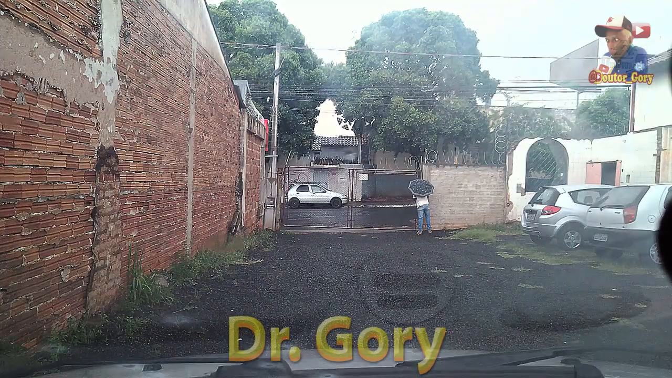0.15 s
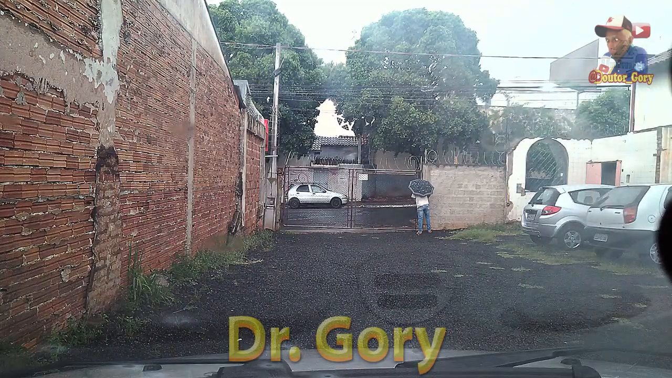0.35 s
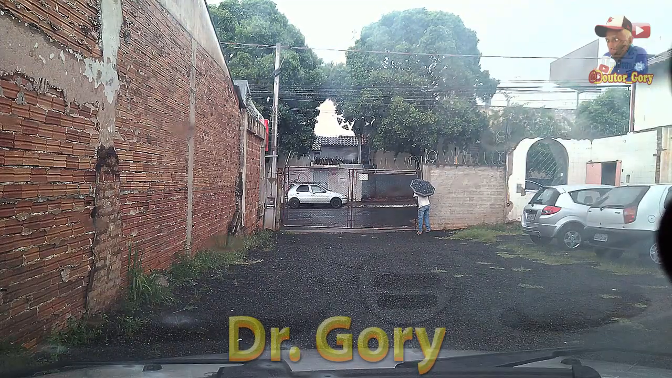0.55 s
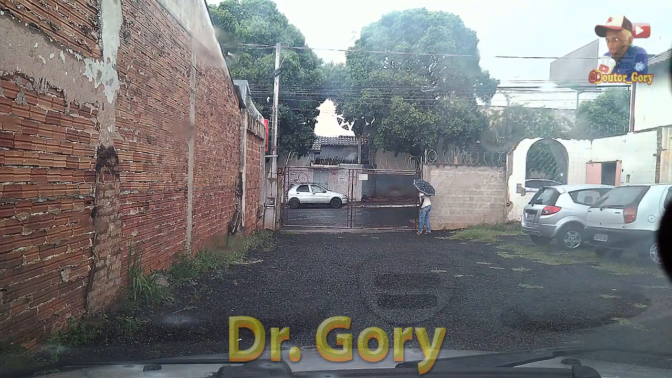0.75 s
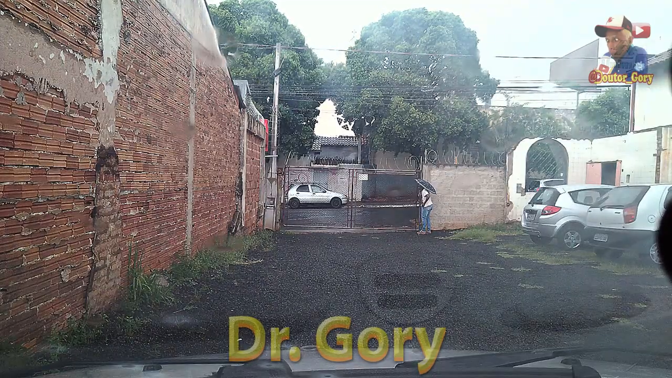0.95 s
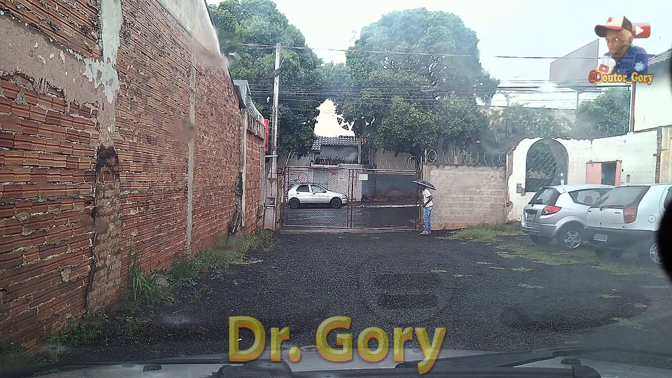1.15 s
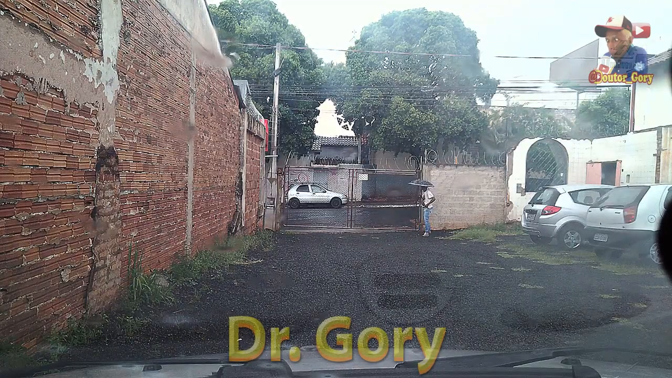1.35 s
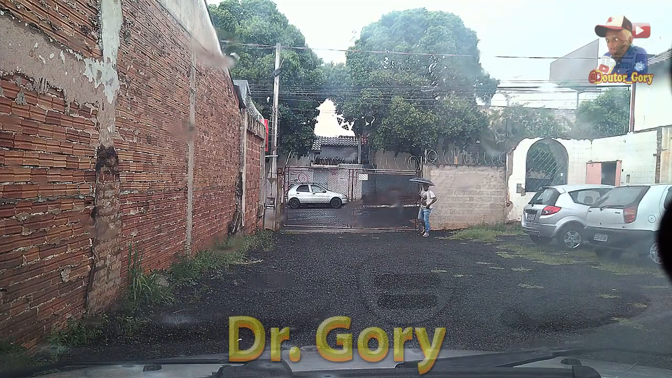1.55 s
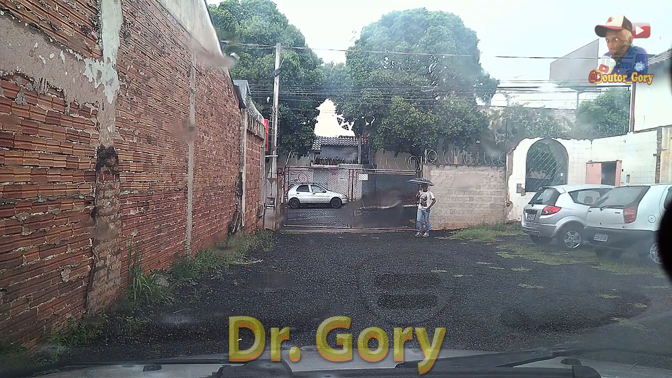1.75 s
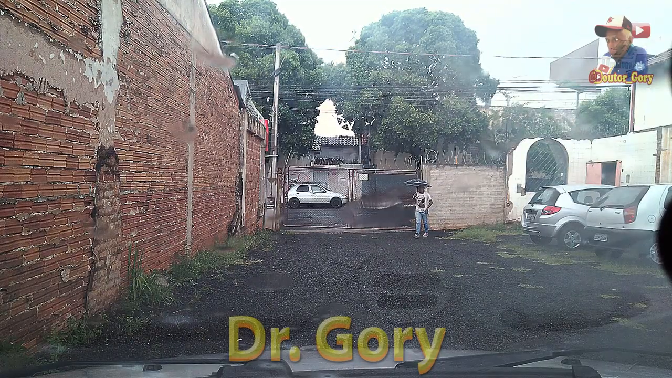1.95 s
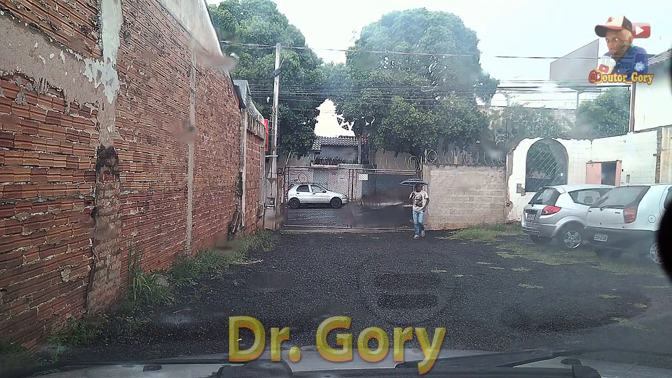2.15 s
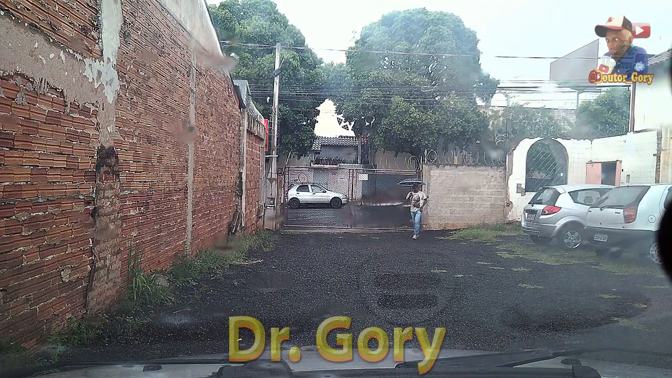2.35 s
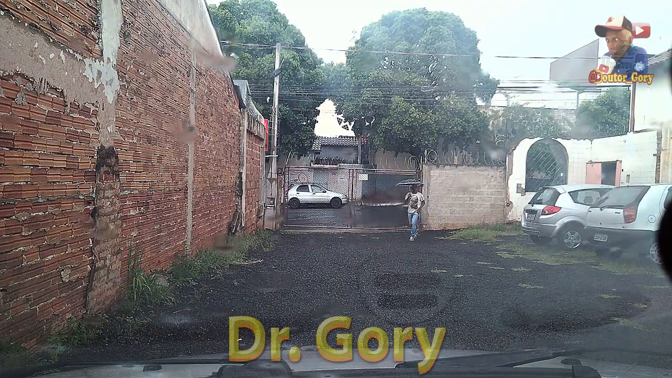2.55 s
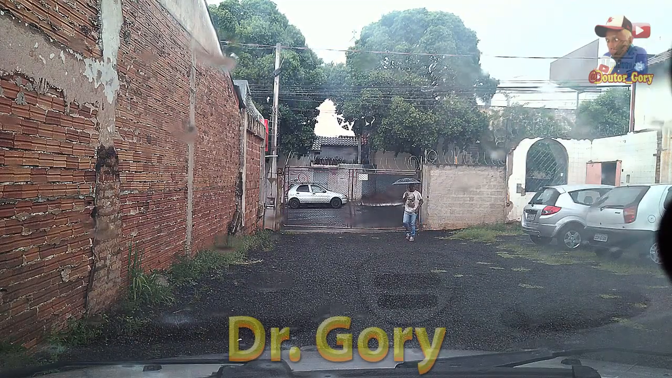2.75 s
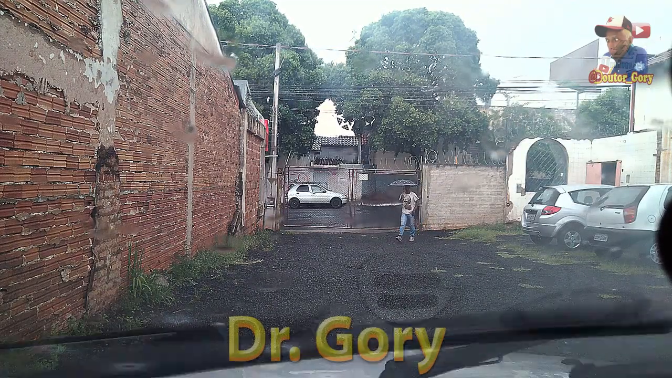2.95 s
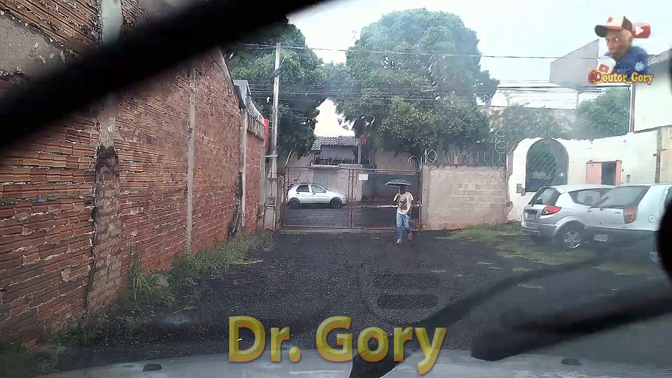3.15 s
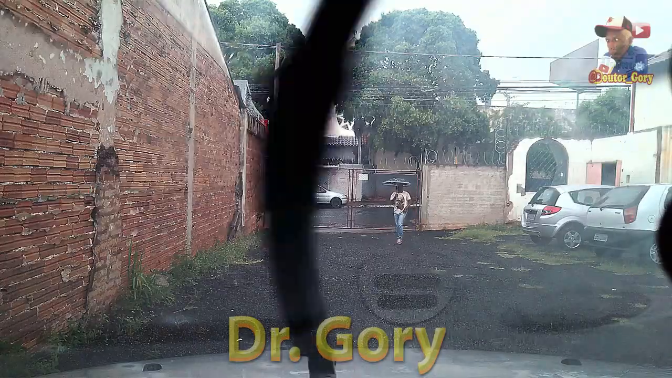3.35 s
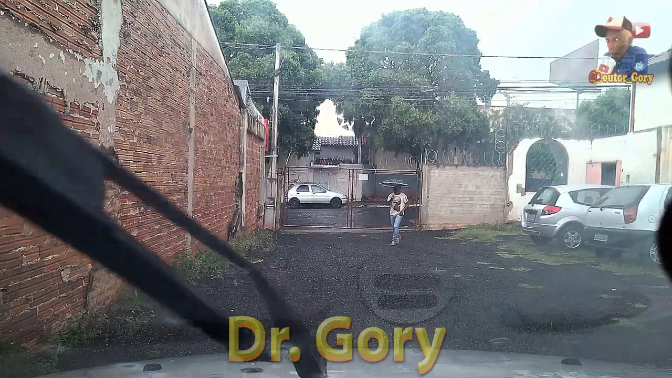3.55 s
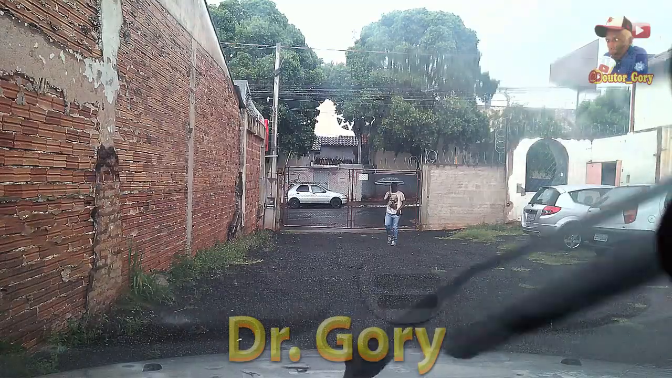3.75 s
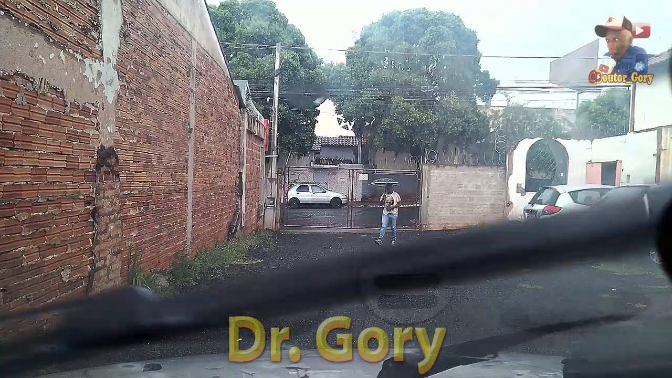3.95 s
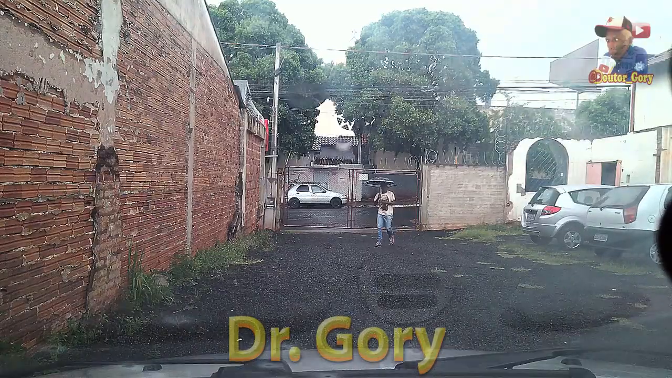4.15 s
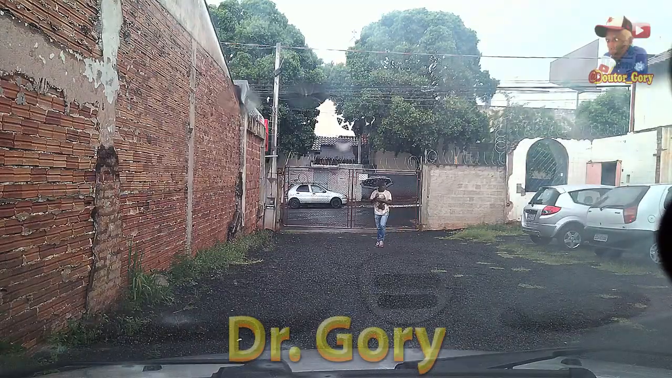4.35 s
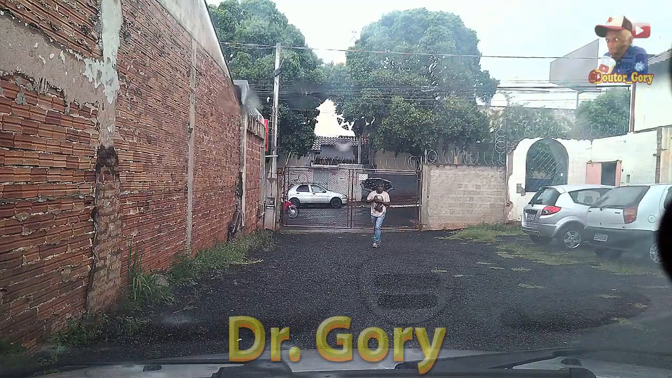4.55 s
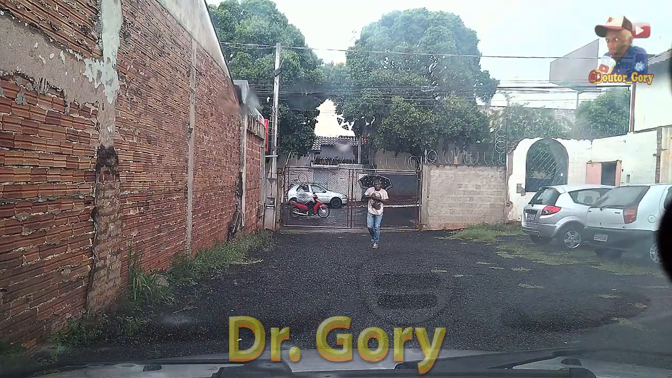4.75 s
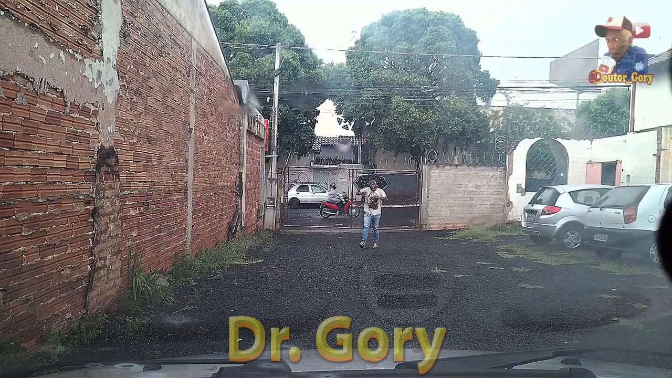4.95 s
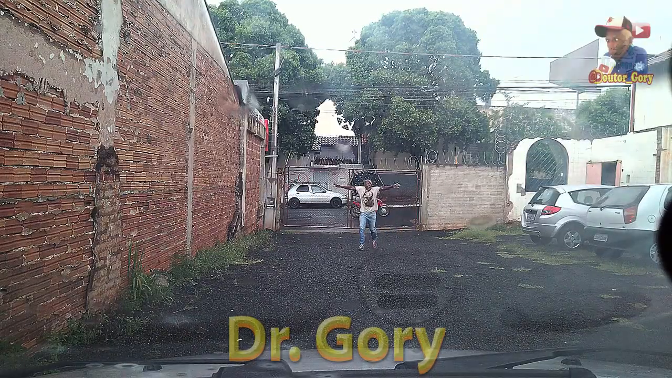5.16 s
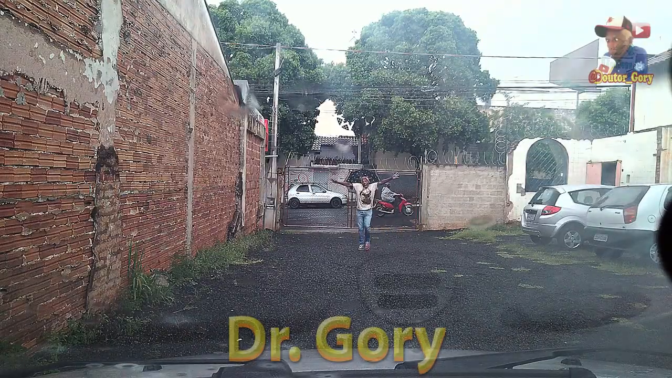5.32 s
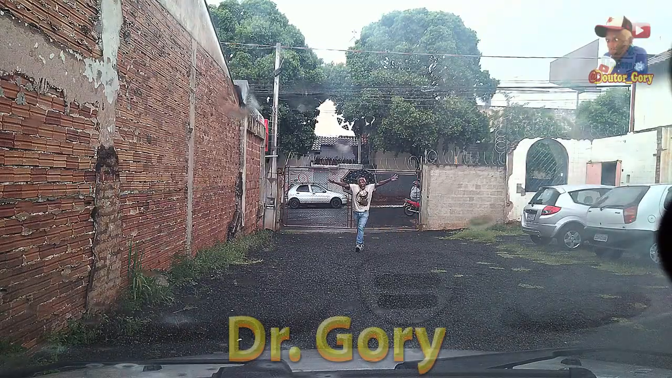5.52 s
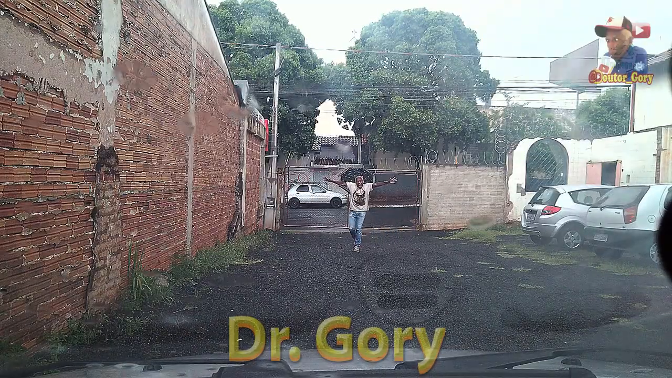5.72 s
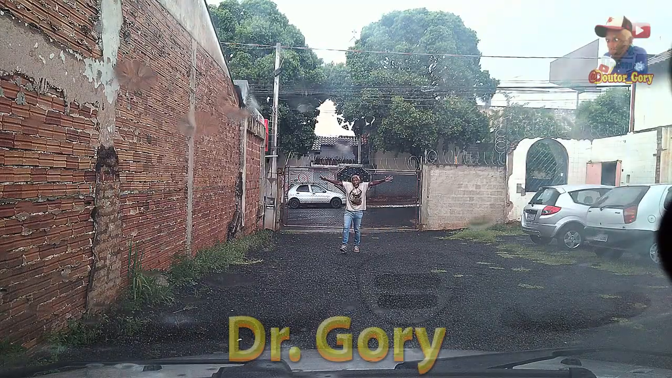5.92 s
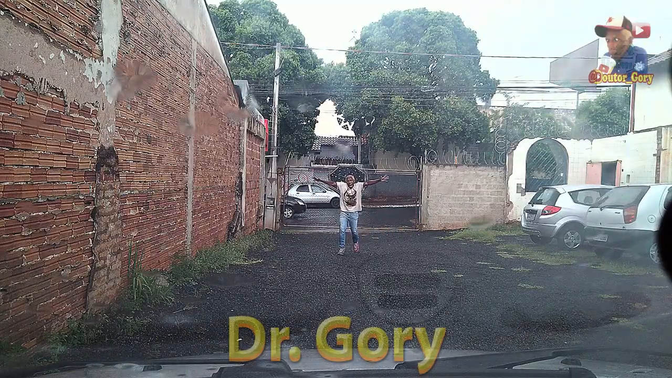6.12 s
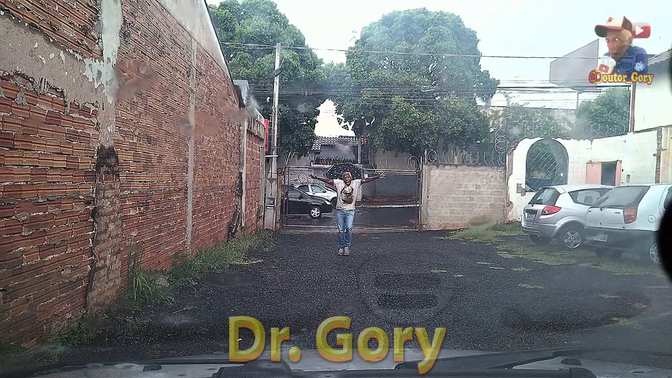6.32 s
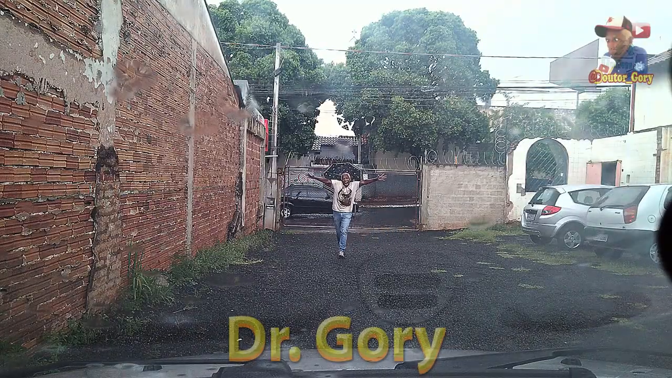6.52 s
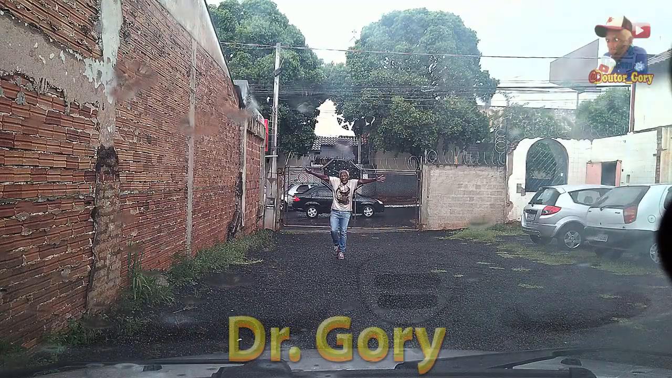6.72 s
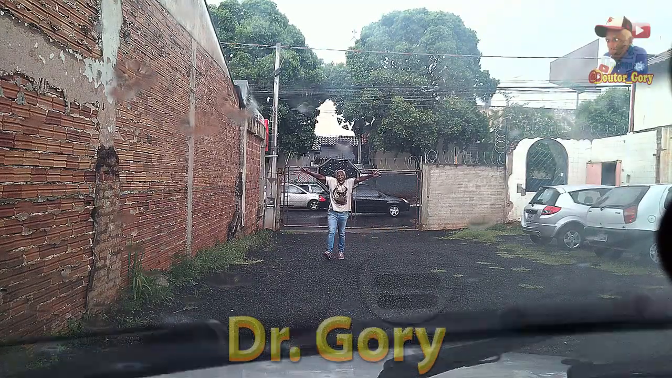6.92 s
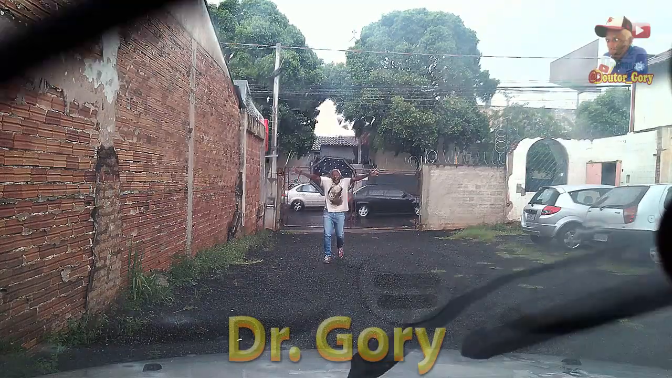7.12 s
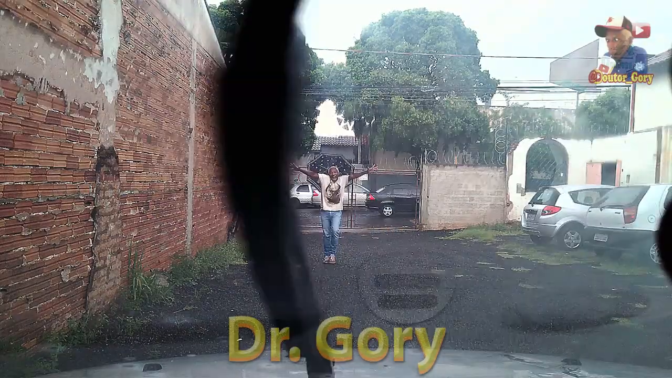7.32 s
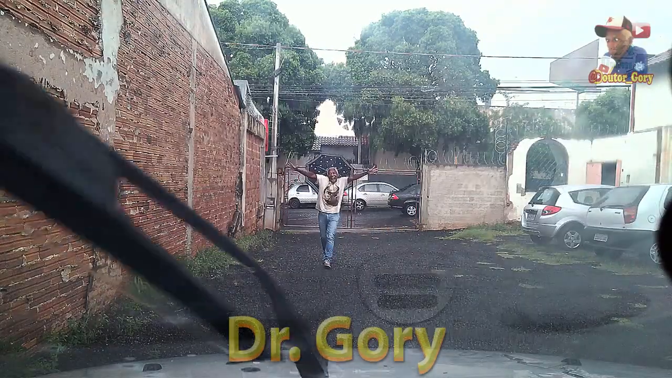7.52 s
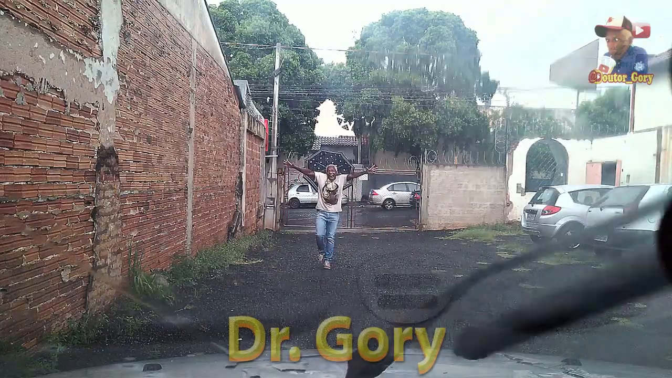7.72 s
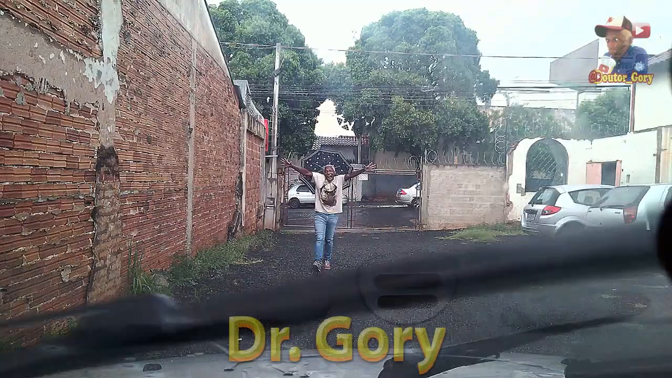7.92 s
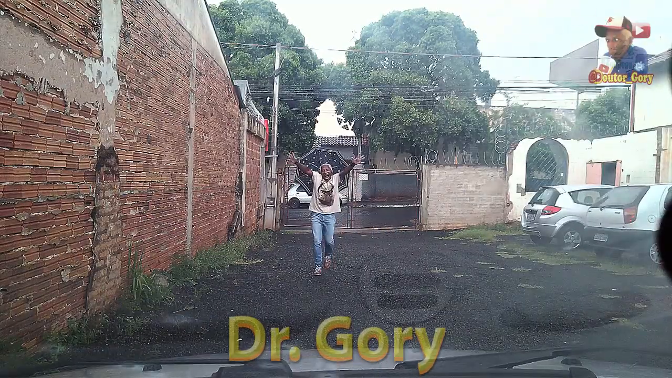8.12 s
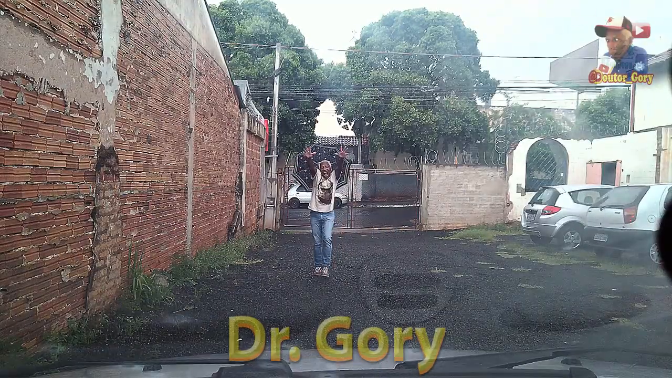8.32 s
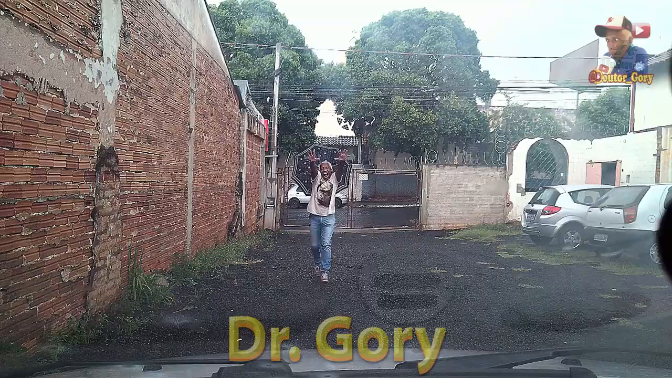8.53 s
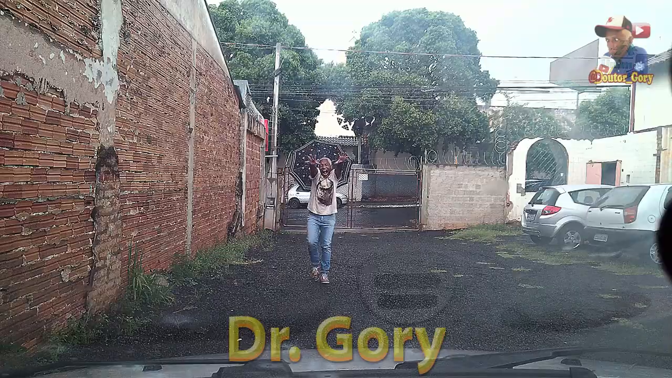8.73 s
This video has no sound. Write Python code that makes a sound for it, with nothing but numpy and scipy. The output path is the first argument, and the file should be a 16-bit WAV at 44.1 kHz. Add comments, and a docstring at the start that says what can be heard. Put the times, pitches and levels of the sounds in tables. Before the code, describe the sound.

Inside a parked car, steady rain patters on roof and windshield: dense fine ticks, occasional sharper drops and a soft low boom overhead. A wiper sweep begins with a small click and low motor rumble, the rubber groaning and thudding across the glass and back. Rain alone follows, then a second, heavier sweep. A faint fan hum stays underneath. Close stereo cabin perspective, muffled and dry.

```python
"""Parked car in steady rain

Heard from inside the cabin: drops tick, ping and rustle on roof and glass, the roof booms, a fan hums faintly.
Every four seconds a relay ticks and the wiper motor rumbles through the body, as jolts into low resonances.
The rubber blades groan by stick-slip on the wet glass, as gliding overtones with scrubbing noise.
Decaying low swings with a rattle are thuds of blade and linkage, and short low rings within the groans."""
import sys
import numpy as np
from scipy import signal
from scipy.fft import rfft, irfft, next_fast_len
from scipy.io import wavfile

SR = 44100
rng = np.random.default_rng(int(sys.argv[2]) if len(sys.argv) > 2 else 0)


def volts_from_decibels(level):
    """Turn decibel levels (scalar or array-like) into linear amplitude factors."""
    exponent = np.asarray(level, float) / 20
    return 10 ** exponent


def materialize(psi):
    """Save the field psi as 16-bit PCM at rate SR to the path in sys.argv[1].

    A 1-D psi becomes a single channel; in a 2-D psi each row is a channel.
    """
    bounded = np.clip(np.atleast_2d(psi).T, -1, 1)
    quanta = np.round(bounded * 32767).astype(np.int16)
    wavfile.write(sys.argv[1], SR, quanta)


N = 391608   # samples

# wiper sweeps: (relay closes [s], motor strength [dB])
SWEEPS = [(-1.186, 1.5), (2.787, -1), (6.763, 0)]
TURN_S, PARK_S = .63, 1.446   # after the start: blades reverse, relay opens


def rms_one(x):
    """Scale to rms 1."""
    return x / np.sqrt(np.mean(x ** 2) + 1e-20)


def in_time(rows, silent=None):
    """Columns of a curve table at every sample."""
    s, *columns = np.transpose(rows)
    return [np.interp(np.arange(N) / SR, s, c, silent, silent) for c in columns]


def at_hz(points, hz):
    """Read a table on a log-frequency axis."""
    table_hz, values = np.transpose(points)
    return np.interp(np.log(hz + 1), np.log(table_hz), values)


def drift(rate):
    """Slow chance, spread 1, drawn at every 40th sample; a higher rate [Hz] wanders faster."""
    r = np.exp(-80 * np.pi * rate / SR)
    slow = signal.lfilter([1], [1, -2 * r, r * r], rng.standard_normal(N // 40 + 2002))[2000:]
    return np.interp(np.arange(N) / 40, np.arange(len(slow)), rms_one(slow))


def coloured(spectrum):
    """Stereo noise with a spectrum; the two microphones agree in the bass and part in the treble."""
    # left-right likeness: (frequency [Hz], correlation [-1 to 1])
    likeness = [(60, 0.94), (180, 0.9), (550, 0.52), (1650, -0.13), (4970, 0.07), (15000, 0.0)]
    size = next_fast_len(N)
    hz = np.arange(size // 2 + 1) * SR / size
    mid, side = rfft(rng.standard_normal((2, size)))
    alike = np.clip(at_hz(likeness, hz), -1, 1)
    pair = np.sqrt(1 + alike) * mid + np.sqrt(1 - alike) * side * [[1], [-1]]
    return rms_one(irfft(pair * volts_from_decibels(at_hz(spectrum, hz)), size)[:, :N])


def resonate(x, hz, width_hz):
    """Two-pole resonance, gain 1 on top."""
    r = np.exp(-np.pi * width_hz / SR)
    return signal.lfilter([(1 - r * r) / 2, 0, (r * r - 1) / 2], [1, -2 * r * np.cos(2 * np.pi * hz / SR), r * r], x)


def panned(db):
    """Left and right gains for a level difference."""
    return volts_from_decibels(np.array([db / 2, -db / 2]))


def filtered(x, order, hz, kind):
    """Butterworth filter."""
    return signal.sosfilt(signal.butter(order, hz, kind, fs=SR, output="sos"), x)


def strikes(at, size, sides):
    """Stereo impulses of the given sizes at the given samples."""
    return np.array([np.bincount(at, size * side, N) for side in sides])


def falling_drops(level_db):
    """Listed big drops and small ones at random; few of the small drops are strong."""
    # big drops: (time [s], relative tick peak [dB], relative rustle [dB])
    big = np.array([(0.2186, -44, -43), (0.245, -44, -43), (0.403, -48, -48.5), (0.4288, -26, -43),
                    (0.513, -46, -47), (0.608, -44, -48), (0.56, -42, -45), (0.6524, -41, -44.5),
                    (0.69, -43, -45), (0.7582, -31, -48), (0.796, -48, -45), (0.828, -50, -43),
                    (0.8405, -44, -40.5), (0.9318, -31, -44), (0.968, -38, -48), (0.999, -35, -48),
                    (1.0535, -42, -51), (1.083, -45, -45), (1.1828, -39, -45.5), (1.275, -29.5, -41.5),
                    (1.5105, -31.5, -50), (1.5768, -45, -42), (1.621, -45, -47), (1.761, -35, -49.5),
                    (1.8372, -47, -46), (1.9874, -40, -47), (2.1753, -36, -44), (2.3213, -49, -45),
                    (2.583, -34, -45), (2.7674, -35, -46), (2.813, -46, -41), (2.8657, -47, -45),
                    (3.03, -42, -45), (3.092, -42, -44), (3.13, -42, -45), (3.273, -42, -47),
                    (3.418, -40, -49), (3.705, -40, -47), (3.792, -42, -48), (3.8226, -50, -46),
                    (3.937, -38.5, -49), (3.9885, -49, -48), (4.0357, -36, -47.5), (4.16, -42, -44),
                    (4.5463, -32, -45), (4.6016, -40, -45), (4.6645, -38, -44), (4.7706, -42, -43),
                    (5.0045, -37, -44.5), (5.134, -46, -46), (5.2477, -22, -43), (5.303, -48, -48),
                    (5.318, -42, -47), (5.3756, -29, -41), (5.4316, -42, -46), (5.445, -41, -43),
                    (5.5362, -40, -43), (5.5712, -33, -47), (5.5928, -39, -42), (5.699, -40, -41.5),
                    (5.7307, -43, -42), (5.7776, -36, -45), (5.788, -40, -45), (5.8335, -36, -46),
                    (5.856, -40, -49), (5.867, -38, -50), (5.874, -43.5, -46), (5.899, -32, -41),
                    (5.942, -37, -42), (5.977, -38, -48), (5.992, -33, -42), (6.003, -35, -42),
                    (6.0866, -42, -47), (6.171, -42, -46), (6.194, -40, -43), (6.3, -40, -50),
                    (6.4166, -43, -47.5), (6.4547, -40, -45), (6.4792, -31, -43), (7.0354, -26, -43),
                    (7.14, -35, -46), (7.31, -42, -46), (7.357, -42, -44), (7.425, -42, -45),
                    (7.658, -44, -49), (7.6934, -43, -49), (7.7114, -27, -48.5), (7.877, -31, -41.5),
                    (7.9014, -45, -42), (8.032, -44, -50), (8.374, -44, -48), (8.472, -31, -41.5),
                    (8.5694, -43, -46), (8.6273, -38, -44), (8.705, -42, -45.5), (8.763, -44, -51)])
    small_per_s, small_db, size_db, tick_db = 110, -5.5, 2.4, -4.5
    small = rng.random((1500, 2))
    small_at = (np.cumsum(-np.log(1 - small[:, 0]) / small_per_s) * SR).astype(int)
    small, small_at = small[small_at < N], small_at[small_at < N]
    small_peak_db = level_db[small_at] + small_db - size_db * np.log(1 - .95 * small[:, 1])
    at = np.r_[(big[:, 0] * SR).astype(int), small_at]
    rustle_db = np.r_[big[:, 2], small_peak_db]
    contact_db = np.r_[big[:, 1], small_peak_db + tick_db]
    return at, rustle_db, contact_db, np.arange(len(at)) < len(big)


def rustle(at, rustle_db, is_big, sides, colour, level_db):
    """Drops set the panels rustling in bands of noise over a steady bed; the treble dies faster."""
    # relative spectrum of the patter: (frequency [Hz], density [dB])
    patter = [(150, -15), (250, -3.5), (287, -4.5), (385, -3), (536, -2), (659, -5), (744, -3.5),
              (999, -12), (1150, -9.5), (1250, -14), (1460, -10.5), (4210, -18.5), (7850, -34),
              (13700, -32.5), (15700, -41)]
    # decay of the rustle: (frequency [Hz], time to fall 60 dB [s])
    splash_t60 = [(400, 0.2), (1500, 0.15), (5000, 0.063), (12000, 0.061)]
    bed, snap, colour_db, swell_cycles = 0.48, 0.8, 3.0, 2.2
    thin_db = np.where(is_big, -6, -3)   # low-mid cut
    noise, edges = [coloured(patter), coloured(patter)], 220 * 2 ** np.arange(0, 6.3, .5)
    out = 0
    for k, (low, high) in enumerate(zip(edges, edges[1:])):
        hz = np.sqrt(low * high)
        tilt_db = thin_db / (1 + (hz / 1500) ** 2) - 3 * hz / 10000
        size = volts_from_decibels(rustle_db + tilt_db + colour_db * colour[:, k])
        hits = strikes(at, size ** 2, sides ** 2) + 1e-18
        fade = volts_from_decibels(-120 / (at_hz(splash_t60, hz) * SR))   # power decay per sample
        power = signal.lfilter([1], [1, -fade], hits) + (bed * volts_from_decibels(level_db + 0.54 * drift(14))) ** 2
        power += snap * signal.lfilter([1], [1, -fade ** 6], hits)   # the first milliseconds snap
        rise = np.exp(-hz / swell_cycles / SR)   # lower panel modes take longer to build up
        power = signal.lfilter([1 - rise], [1, -rise], power)
        out = out + np.sqrt(power) * filtered(noise[k % 2], 2, [low, high], "band")
    return out


def pings(at, contact_db, is_big, sides, place):
    """Each drop pings at the pitch of the spot it lands on, one of eight resonances."""
    ping_db, small_ping_db, ping_cycles = -10.5, 10.5, 7.0   # cycles to fall 60 dB
    spot = np.digitize(place, [-1.2, -.7, -.3, 0, .3, .7, 1.2])
    size = volts_from_decibels(contact_db + np.where(is_big, 0, small_ping_db))
    out = 0
    for k, hz in enumerate(np.geomspace(1100, 5800, 8)):
        ring = resonate(strikes(at, (spot == k) * size, sides) + 1e-18, hz, 2.2 * hz / ping_cycles)
        out = out + volts_from_decibels(ping_db) * ring * ping_cycles * 3000 / hz
    return out


def contact_ticks(ticks):
    """A drop's first contact is a sharp tick, rung by the glass."""
    # glass modes: (frequency [Hz], width [Hz], gain [dB])
    tick_modes = [(2250, 550, 15), (3400, 900, 5), (4700, 1200, 10.5)]
    rung = sum(volts_from_decibels(db) * resonate(ticks, hz, width_hz) for hz, width_hz, db in tick_modes)
    return filtered(rung, 4, [1300, 5900], "band")


def rain():
    """Each drop gives a tick, a ping and a rustle, with a colour and a place of its own."""
    # level of the patter, sinking under the loud wiper strokes: (time [s], relative level [dB])
    patter_level = [(0.0, -53), (1.48, -51), (3.48, -55), (5.89, -50), (6.97, -53.5), (7.71, -50.5),
                    (8.11, -53.5), (8.88, -53)]
    spread_db, echo_s, echo, crisp_db = 4, .003, .4, -27
    level_db = in_time(patter_level)[0] + .8 * drift(4)
    at, rustle_db, contact_db, is_big = falling_drops(level_db)
    chance = rng.standard_normal((1600, 15))[:len(at)]
    sides = panned(spread_db / 2 * chance[:, -1] * np.where(is_big, .4, 1))   # big drops land near the middle
    ticks = strikes(at, volts_from_decibels(contact_db), sides)
    # bounced off the opposite window
    ticks = ticks + echo * np.roll(ticks[::-1], int(echo_s * SR), axis=1) + 1e-18
    splash = rustle(at, rustle_db, is_big, sides, chance, level_db)
    splash = splash + pings(at, contact_db, is_big, sides, chance[:, -2])
    splash = splash + volts_from_decibels(crisp_db) * filtered(ticks, 2, 6500, "high")
    return 2.0 * splash + contact_ticks(ticks)


def drumming():
    """Rain booming in the roof and the cabin air, with a faint, nearly steady fan tone."""
    # relative spectrum of roof and cabin boom: (frequency [Hz], density [dB])
    boom_spectrum = [(21, -16), (35, -7.5), (54, 6), (107, -7), (135, 5.5), (168, -1), (204, -5),
                     (231, -26), (254, -25), (271, 0), (287, -37), (330, -10), (430, -24), (730, -120)]
    # swells of the lowest rumble: (time [s], gain [dB])
    deep = [(0, -3), (3.5, -3), (4.5, 2), (6.5, 2.5), (8.88, 0)]
    boom_db, fan_hz, fan_db = -45.5, 261, -61
    waver_hz, waver_db = .8 * drift(2), 1.2 * drift(1.5)
    fan = np.sqrt(2) * np.sin(2 * np.pi * np.cumsum(fan_hz + waver_hz) / SR)
    boom = coloured(boom_spectrum)
    boom = boom + (volts_from_decibels(in_time(deep)[0]) - 1) * resonate(boom, 54, 45)
    return volts_from_decibels(boom_db + 0.89 * drift(10)) * boom + volts_from_decibels(fan_db + waver_db) * fan


def body_modes(shake, modes):
    """The car body answers with resonances, each passed twice and so widened first; rms 1."""
    out = 0
    for hz, width_hz, db in modes:
        once = resonate(shake, hz, 1.27 * width_hz)
        out = out + volts_from_decibels(db) * resonate(once, hz, 1.27 * width_hz)
    return rms_one(out)


def drive():
    """Motor and linkage jolt the body unevenly; it answers with its low resonances."""
    # low body modes: (frequency [Hz], width before widening [Hz], relative level [dB])
    boom_modes = [(62, 14, 0.5), (87, 31, -1)]
    # upper body modes, same columns
    growl_modes = [(150, 43, 1.5), (192.3, 51.5, -4), (325, 66, -14.5)]
    # motor load through a sweep: (time after the start [s], level before the sweep's strength [dB])
    load = [(0, -52), (.03, -36), (.15, -31), (.29, -33), (.39, -36.5), (.51, -43), (.64, -37.5),
            (.78, -37), (.9, -33), (1.02, -42), (1.2, -36), (1.32, -42), (1.45, -37), (1.62, -52)]
    jolts_per_s, smooth = 45, 0.35
    growl_db, growl_db_per_s = -1.5, -2   # against the boom; it sinks as the glass is wiped
    jolts = (rng.random(N) < jolts_per_s / SR) * rng.standard_normal(N)
    shake = rms_one(jolts) + smooth * coloured([(20, 0), (600, 8), (1200, -43)])
    boom, growl = body_modes(shake, boom_modes), body_modes(shake, growl_modes)
    out = 0
    for start, strength_db in SWEEPS:
        load_db, = in_time(np.add(load, [start, strength_db]), -120)
        since = np.clip(np.arange(N) / SR - start, 0, PARK_S)
        out = out + volts_from_decibels(load_db) * (boom + volts_from_decibels(growl_db + growl_db_per_s * since) * growl)
    return out


def thuds_and_rings():
    """A soft blow or ring: a low swing of a few cycles and a short rattling knock above it."""
    # thuds of blade and linkage, and short low rings within the groans:
    # (time [s], level [dB], pitch [Hz], knock against swing [dB])
    swings = [(0.068, -36, 204, -11), (0.205, -25, 102, -18), (0.24, -22, 95, -9), (0.277, -27, 85, -20),
              (0.31, -30, 62, -25), (2.791, -20, 130, -19), (2.879, -32, 56.7, -2), (2.996, -24, 270, -20),
              (3.028, -21, 282, -20), (3.057, -17, 135, -14), (3.075, -19, 105, -8), (3.095, -21, 255, -18),
              (3.52, -24, 350, -20), (3.612, -34, 300, 2), (3.628, -24, 190, -13), (3.648, -19.5, 90, -25),
              (3.678, -26, 56.5, -22), (3.93, -32, 147, -22), (4.214, -29, 149, -5),
              (6.768, -18.5, 129, -13), (6.846, -27, 168, -9), (6.97, -21, 200, -20),
              (6.9865, -12, 215, -20), (6.995, -17, 275, -22), (7.006, -12.5, 240, -24),
              (7.02, -22, 130, -25), (7.182, -22, 245, -12), (7.402, -28, 555, -20), (7.485, -26, 380, -20),
              (7.591, -20, 280, -14), (7.592, -33, 640, -20), (7.61, -28, 125, -25),
              (7.651, -21, 58.3, -28), (7.9, -28, 67, -29), (8.056, -25, 95, -28), (8.105, -29, 105, -25),
              (8.15, -30, 100, -20), (8.185, -27, 152, -6), (8.2, -23, 105, -22), (8.22, -26, 99, -24)]
    swing_cycles, knock_hz, knock_t60, knock_rise_s = 11, 440, 0.09, 0.0055   # cycles to fall 60 dB
    out, t = np.zeros(N + SR), np.arange(SR // 4) / SR
    for s, db, hz, upper_db in swings:
        swing = np.sin(2 * np.pi * hz * t) * volts_from_decibels(-60 * t * hz / swing_cycles)
        rattle = rng.standard_normal(len(t))
        for width_hz in (270, 330, 300):
            rattle = resonate(rattle, knock_hz, width_hz)
        knock = volts_from_decibels(upper_db - 60 * t / knock_t60) * rms_one(rattle) * np.minimum(t / knock_rise_s, 1)
        out[int(s * SR):][:len(t)] += volts_from_decibels(db) * (swing + knock)
    return out[:N]


def relay():
    """The contact snaps and chatters for some milliseconds as it closes and opens; the small case rings briefly."""
    # case modes: (frequency [Hz], gain [dB], time to fall 60 dB [s])
    case_modes = [(2640, -4, 0.004), (4070, 2, 0.003), (5740, -7, 0.0025), (9840, -6, 0.0026),
                  (11280, -7, 0.0055), (13300, -6, 0.0029)]
    close_db, open_db, chatter_s, fade_db = -32, -36, .008, -6   # fade over the chatter
    clicks = np.zeros((2, N)) + 1e-18
    moves = [(start + after, db) for start, _ in SWEEPS for after, db in ((0, close_db), (PARK_S, open_db))]
    for s, db in moves:
        if s <= 0:
            continue
        when, left, right = rng.random((3, 40))
        at = ((s + chatter_s * when) * SR).astype(int)
        clicks[:, at] += volts_from_decibels(db + fade_db * when) * (np.array([left, right]) - .5)
    out = 0
    for hz, db, t60 in case_modes:
        r, w = volts_from_decibels(-60 / (t60 * SR)), 2 * np.pi * hz / SR
        out = out + signal.lfilter([0, volts_from_decibels(db) * np.sin(w)], [1, -2 * r * np.cos(w), r * r], clicks)
    return out


def groans():
    """The rubber edge sticks and slips at a gliding, jittering rate; a glass resonance lifts nearby overtones."""
    # blade groans: (start [s], length [s], peak level [dB], first slip rate [1/s], last rate before any sag [1/s])
    strokes = [(2.98, .078, -22, 165, 150), (3.082, .075, -25, 212, 288), (3.19, .026, -35, 335, 350),
               (3.285, .075, -41, 420, 378), (3.338, .068, -34.5, 432, 430), (3.434, .115, -21, 262, 262),
               (6.962, .066, -23, 135, 165), (7.045, .088, -24, 212, 295), (7.174, .058, -22.5, 235, 290),
               (7.26, .06, -43, 385, 436), (7.3, .072, -40, 442, 418), (7.36, .045, -45, 398, 406),
               (7.404, .118, -21.5, 258, 258)]
    # the slow blade judders, scrapes, glides, then flips over at the turn, each way with the columns
    # (roughness [0-1], fall of the overtones [dB per octave], grit against the tone [dB], peak [share of length],
    #  end against peak [dB], left over right [dB], lowest tone's change by the end [dB])
    judder, scrape = (.3, 9.5, -24, .5, -9, 6, -1), (.14, 11.5, -21.5, .4, -4, 4, -22)
    glide, flip = (.15, 17, -21, .6, -14, 2.5, 1), (.09, 18, -28, .25, -12, -2.5, -6)
    judder_until_s, scrape_until_s = .26, .37   # after the sweep's start
    rise_db, grip_db, grip_s = -14, 13, .018   # level at the start; extra grit as the rubber first grips
    sag_share, break_up = .42, 4.0   # as a flip dies its slip rate drops and it grows rougher
    lag_s, lag_s_per_db, glass_hz, glass_db, even_db = 0.00025, .00003, 780, 8, -3
    rasp_hz, rasp_db = 1600, -9
    out, rasped, jitter, wobble = np.zeros((2, N)), np.zeros((2, N)), drift(88), drift(82)
    shared, own = rng.standard_normal((2, N))
    scrub = rms_one(resonate(resonate(shared + .4 * own * [[1], [-1]], 600, 650), 640, 600))
    rasp = rms_one(resonate(resonate(rng.standard_normal((2, N)), rasp_hz, 800), rasp_hz, 1100))
    for s, length, peak_db, first_hz, last_hz in strokes:
        since = min(s - start for start, _ in SWEEPS if start < s)
        flips = since >= TURN_S
        if since < judder_until_s:
            way = judder
        elif since < scrape_until_s:
            way = scrape
        else:
            way = flip if flips else glide
        rough, fall_db, under_db, top, end_db, pan_db, lowest_db = way
        span = slice(int(s * SR), int((s + length) * SR))
        share = np.linspace(0, 1, span.stop - span.start)
        hz = first_hz + (last_hz - first_hz) * share ** 1.5
        hz = hz * (1 - sag_share * flips * share ** 6.0)
        rough = rough * (1 + break_up * flips * share ** 3.0)
        db = peak_db + rise_db * np.maximum(1 - share / top, 0) ** 2
        db = db + end_db * np.maximum((share - top) / (1 - top), 0) ** 1.7
        phase = 2 * np.pi * np.cumsum(hz * (1 + 0.4 * rough * jitter[span])) / SR
        # the right microphone hears it later
        late = phase - 2 * np.pi * hz * (lag_s + lag_s_per_db * pan_db) * [[0], [1]]
        wave = 0
        for k in range(1, 9):
            tone_db = lowest_db * (k == 1) * share ** 2.5 - fall_db * np.log2(k)
            if not flips:
                tone_db = tone_db + even_db * (k % 2 == 0) + glass_db / (1 + ((k * hz - glass_hz) / 190) ** 2)
            wave = wave + volts_from_decibels(tone_db) * np.sin(k * late + k * k)
        # each slip scrubs the glass
        slips = volts_from_decibels(db + under_db + grip_db * np.exp(-share * length / grip_s)) * (1 + np.sin(late))
        edge = panned(np.array([pan_db])) * signal.windows.tukey(len(phase), .2)
        tone = np.sqrt(2) * volts_from_decibels(db) * wave * (1 + rough * wobble[span])
        out[:, span] += edge * (tone + slips * scrub[:, span])
        rasped[:, span] += edge * slips * rasp[:, span]
    muffled = filtered(out + 1e-18, 5, 940, "low") + .14 * out   # glass and trim muffle the top
    return volts_from_decibels(rasp_db) * rasped + muffled


def scene():
    """Most sources are a little nearer the left microphone; the relay sits to the right."""
    leftish = (rain() + drumming() + drive() + thuds_and_rings()) * panned(np.array([1.7]))
    return leftish + relay() * panned(np.array([-2.5])) + groans()


def roll_off(x):
    """The treble ends steeply here."""
    return signal.sosfilt(signal.butter(12, 15840, fs=SR, output="sos"), x)


def record(dry):
    """The microphone loses the deepest bass, dips near 8 kHz and fades at the very top."""
    dipped = dry - 0.46 * resonate(dry, 7900, 2200)
    topped = filtered(dipped, 6, 14800, "low")
    finished = filtered(topped, 5, 42, "high")
    return roll_off(finished)


dry = scene()
out = record(dry)
materialize(out)
```